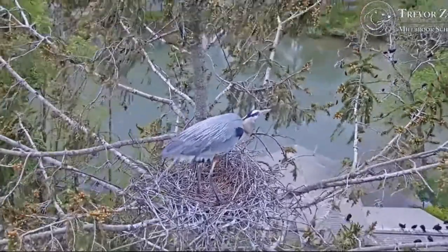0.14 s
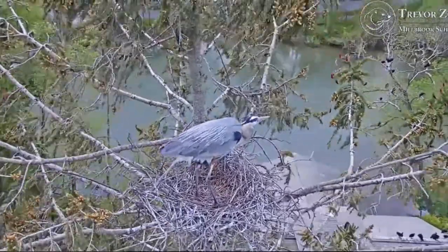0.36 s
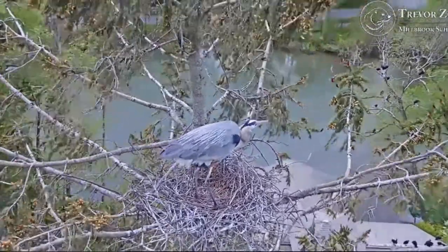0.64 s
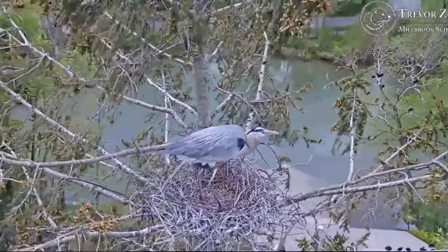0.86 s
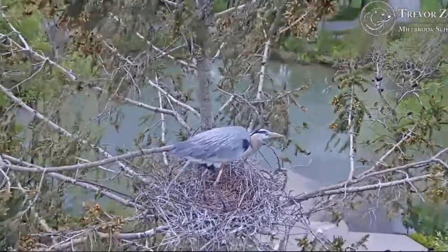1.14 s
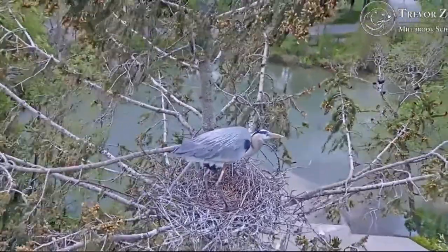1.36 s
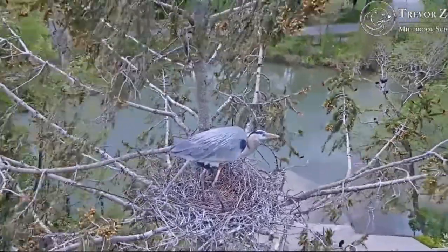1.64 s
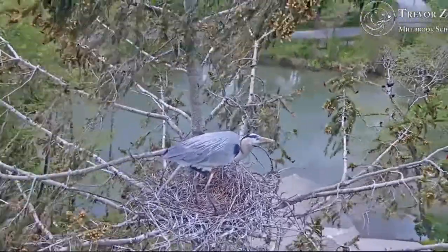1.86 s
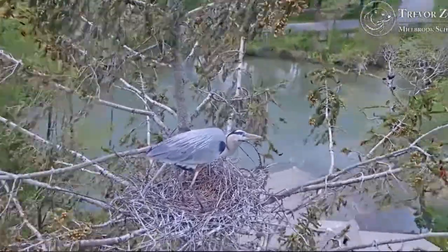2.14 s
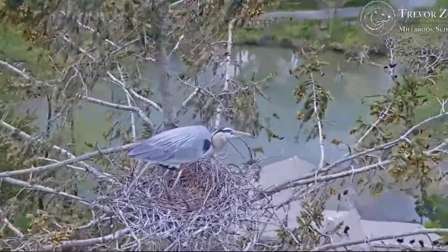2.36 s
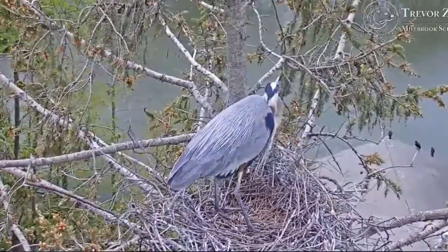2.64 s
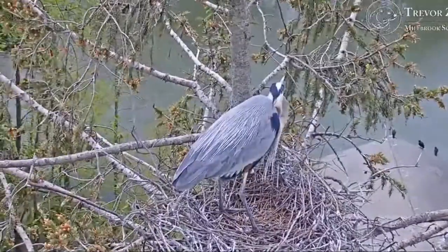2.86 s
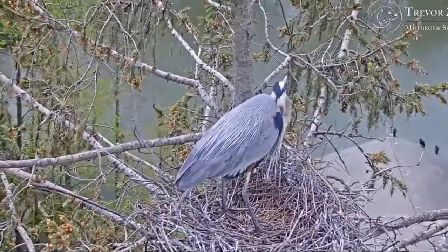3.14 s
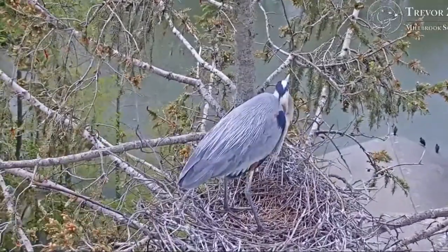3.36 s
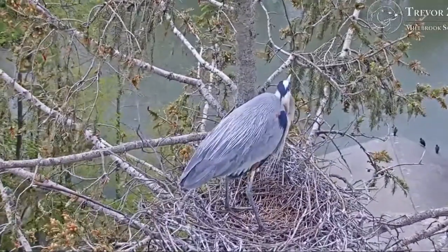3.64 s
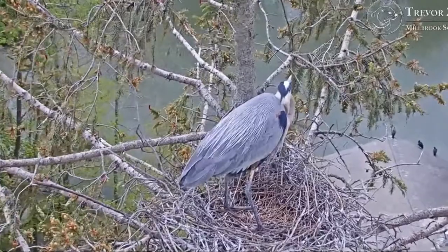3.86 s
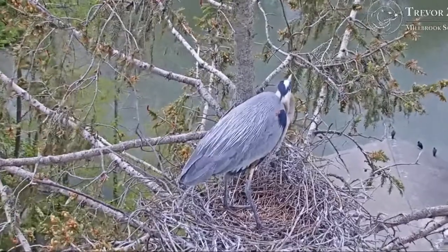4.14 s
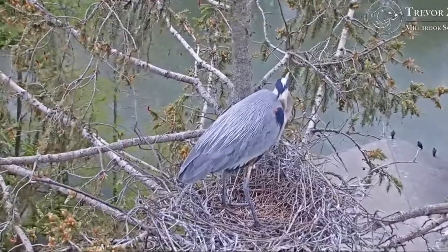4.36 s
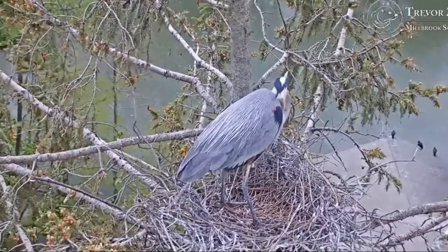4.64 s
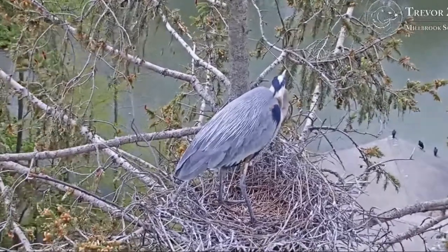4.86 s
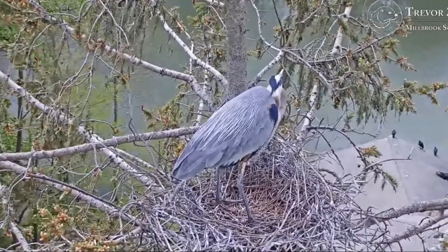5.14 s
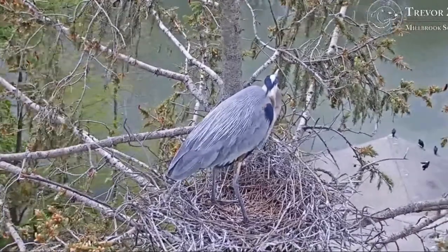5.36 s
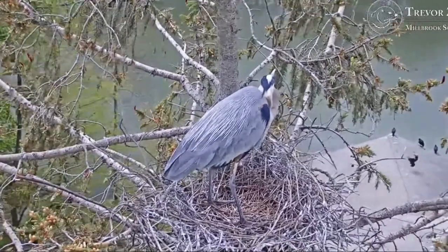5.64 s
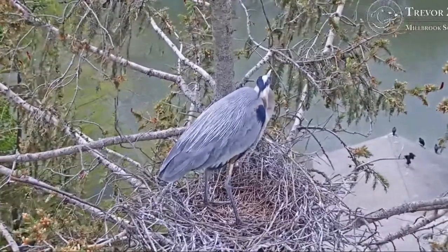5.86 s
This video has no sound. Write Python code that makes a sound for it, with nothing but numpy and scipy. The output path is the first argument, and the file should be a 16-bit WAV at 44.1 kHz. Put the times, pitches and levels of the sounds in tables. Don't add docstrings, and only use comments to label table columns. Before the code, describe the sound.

Gusty wind flutters low and blows hollowly on a small outdoor microphone, hissing through needles, with dry twig cracks and a brief final whistle.

```python
import sys
import numpy as np
from scipy import signal
from scipy.fft import rfft, irfft, next_fast_len
from scipy.io import wavfile
from scipy.ndimage import map_coordinates

SR = 44100
rng = np.random.default_rng(int(sys.argv[2]) if len(sys.argv) > 2 else 0)


def int16_out(signal):
    q = np.round(np.clip(np.atleast_2d(signal).T, -1, 1) * 32767)
    wavfile.write(sys.argv[1], SR, q.astype(np.int16))


def to_linear_factor(level_db):
    exponent = np.asarray(level_db, float) / 20
    return 10 ** exponent


N = 264908
TIME = np.arange(N) / SR

# time in seconds, push on the housing in dB, flow across the port in dB,
# port pitch in Hz, needle hiss in dB.
WIND = [(0.0, -55.5, -62, 2140, -69), (0.27, -50.5, -58.5, 2240, -63.5), (0.45, -57.5, -68, 2080, -71),
        (0.66, -52.5, -60, 2170, -65.5), (0.97, -51, -61.5, 2090, -66), (1.05, -60.5, -66.5, 2050, -69),
        (1.37, -56.5, -64, 2010, -67), (1.9, -49.5, -59, 2015, -66), (2.1, -54, -63, 2020, -66.5),
        (2.78, -54.5, -61.5, 1970, -69.5), (2.88, -62.5, -65.5, 2000, -68.5),
        (3.15, -66.5, -65.5, 2014, -68), (3.62, -61, -65, 2010, -64), (3.8, -47.5, -55.5, 2000, -62.5),
        (4.13, -56.5, -62, 1974, -66.5), (4.62, -47.5, -51.5, 2012, -60), (5.4, -50, -57.5, 1910, -70),
        (5.65, -54.5, -61.5, 1990, -67.5)]
# start in seconds, depth in dB, length in seconds.
LULLS = [
    (1.01, 1, 0.08),
    (4.367, 4.5, 0.1),
    (4.748, 6, 0.044),
    (4.893, 1, 0.022),
    (5.259, 12, 0.022),
    (5.474, 12, 0.012),
    (5.57, 4, 0.1),
]
# start in seconds, peak in dB, length in seconds.
PUSHES = [(0.086, -48, 0.03), (4.592, -40, 0.05), (0.345, -37, 0.021), (2.168, -37, 0.031),
          (1.001, -33, 0.015), (1.247, -45, 0.028), (1.299, -38, 0.038), (1.422, -43, 0.038),
          (1.496, -37.5, 0.054), (1.644, -35.5, 0.02), (1.774, -41, 0.047), (1.909, -29.5, 0.04),
          (2.021, -35, 0.026), (2.316, -39, 0.089), (2.482, -33, 0.022), (2.55, -33, 0.041),
          (2.774, -33.5, 0.092), (3.185, -46, 0.087), (3.293, -39.5, 0.04), (3.433, -44.5, 0.032),
          (3.994, -42, 0.14), (4.193, -37, 0.046), (4.257, -32, 0.079), (4.441, -32, 0.05),
          (4.846, -40, 0.02), (5.05, -45, 0.038), (5.183, -35.5, 0.03), (5.489, -37, 0.13),
          (5.871, -29, 0.032), (5.95, -32, 0.025)]
# start in seconds, peak in dB, hiss relative to it in dB,
# length in seconds.
PUFFS = [(0.3, -45, -15, 0.071), (0.413, -46.5, -19, 0.04), (0.724, -46, -19, 0.018),
         (0.9, -42, -13, 0.031), (0.992, -44.5, -10, 0.025), (1.732, -44, -16, 0.019),
         (1.795, -47.5, -13, 0.07), (1.913, -41, -11, 0.026), (1.968, -48, -14, 0.012),
         (2.544, -39, -11, 0.049), (2.772, -46, -13, 0.029), (2.803, -38.5, -12.5, 0.049),
         (3.72, -41.5, -11, 0.025), (3.795, -34.5, -11.5, 0.06), (3.857, -38.5, -13, 0.087),
         (4.044, -39, -14, 0.035), (4.269, -34.5, -12, 0.07), (4.442, -33, -8.5, 0.049),
         (4.5087, -32.5, -11, 0.053), (4.579, -35, -9.5, 0.054), (4.675, -39.5, -10.5, 0.12),
         (4.809, -34.5, -8, 0.051), (4.925, -39, -11, 0.087), (5.015, -37.5, -10.5, 0.023),
         (5.1, -47.5, -15, 0.11), (5.195, -37.5, -12, 0.073), (5.293, -37.5, -10.5, 0.21),
         (5.484, -41.5, -16, 0.12), (5.869, -35.5, -13, 0.033), (5.925, -42.5, -26, 0.08)]
# frequency in Hz, level in dB per Hz.
HOUSING_TONE = [(29, -81.5), (50, -44), (69, -40.5), (116, -18), (143, -4), (227, 3.5), (614, -7.5),
                (785, -17), (1060, -27), (1300, -21.5), (1690, -32), (2860, -120)]
PORT_HZ = [
    1770,
    2050,
    2350,
]
# frequency in Hz, gain in dB.
MIC_TONE = [(50, 4), (3500, 4.5), (5000, -4), (6500, -7.5), (7500, -29.5), (9000, -44), (11000, -63)]
# frequency in Hz, level in dB per Hz.
NEEDLE_TONE = [(1800, -23.5), (2700, -13), (3100, -1.5), (3800, 1.5), (4400, -8), (5000, -15), (6300, -19),
               (7000, -26), (8000, -45.5), (10000, -48.5), (12000, -80)]
# frequency in Hz, level in dB per Hz.
CANOPY_TONE = [(2500, -36.5), (4000, 2.5), (5000, -2), (6500, -5.5), (7300, -12), (9000, -18), (12000, -22),
               (12600, -73.5)]
# middle in seconds, extra level in dB, length in seconds.
LURCHES = [
    (0.62, 7, 0.077),
    (1.223, 14, 0.14),
    (2.2, 6.5, 0.17),
    (2.552, 7, 0.061),
    (3.3, 7, 0.057),
]
# time in seconds, peak in dB.
SNAPS = [(0.7231, -52), (0.991, -62), (1.639, -53), (1.7367, -52.5), (1.919, -38), (1.935, -45),
         (1.9607, -48.5), (2.044, -63), (2.052, -47), (1.598, -55), (2.5422, -58), (2.5664, -51),
         (2.7682, -55), (3.8159, -56), (3.8983, -47), (4.27, -60), (4.442, -55), (4.5227, -44),
         (4.558, -44), (4.6595, -44.5), (4.6765, -45), (4.7028, -46), (4.7434, -41), (4.8161, -40.5),
         (4.8327, -51), (5.2284, -49), (5.2862, -45), (5.4885, -51), (5.5736, -52), (5.873, -50)]
# time in seconds, peak in dB.
SNAP_EDGES = [
    (1.919, -77),
    (1.9599, -86),
    (2.5411, -67),
    (4.5226, -59),
    (5.2505, -62),
]
# start in seconds, level in dB, length in seconds.
PEEPS = [
    (5.005, -53, 0.03),
    (5.228, -49, 0.03),
    (5.3, -49.5, 0.035),
    (5.345, -51, 0.02),
    (5.385, -49, 0.028),
]
# time in seconds, pitch in Hz, level in dB.
WHISTLE = [
    (5.895, 1600, -58),
    (5.912, 1600, -51),
    (5.94, 1470, -52),
    (5.955, 1600, -50),
    (5.961, 1680, -45),
    (5.978, 1680, -46.5),
    (5.99, 1560, -58),
]


def unit(x):
    return x / np.sqrt(np.mean(x ** 2) + 1e-20)


def curves(rows):
    s, *columns = np.transpose(rows)
    return [np.interp(TIME, s, column) for column in columns]


def wobble(rate):
    knots = rng.standard_normal(int(N * rate / SR) + 4)
    return map_coordinates(knots, [TIME * rate])


def coloured(x, points):
    size = 2 * next_fast_len(N // 2 + 4096)
    hz, level = np.transpose(points)
    log_hz = np.log(np.fft.rfftfreq(size, 1 / SR) + 1)
    gain = to_linear_factor(np.interp(log_hz, np.log(hz + 1), level))
    cepstrum = irfft(np.log(gain / np.sqrt(np.mean(gain ** 2))), size)
    cepstrum[1:size // 2] *= 2
    cepstrum[size // 2 + 1:] = 0
    return irfft(rfft(x, size) * np.exp(rfft(cepstrum)), size)[:N]


def cavity(x, hz, width_hz):
    size = next_fast_len(N + 4096)
    f = np.fft.rfftfreq(size, 1 / SR)
    gain = (1j * f * width_hz / (hz * hz - f * f + 1j * f * width_hz)) ** 2
    gain_rms = np.sqrt(np.mean(np.abs(gain) ** 2))
    return irfft(rfft(x, size) * gain / gain_rms, size)[:N]


def bursts(times, levels_db, lengths, rise):
    power = np.zeros(N + SR)
    t = np.arange(SR // 4) / SR
    for s, db, length in zip(times, levels_db, np.clip(lengths, 0.001, 0.16)):
        shape = (1 - np.exp(-t / rise)) * np.exp(-(t / length) ** 6)
        start = max(round((s - rise) * SR), 0)
        power[start:][:len(t)] += (to_linear_factor(db) * shape) ** 2
    return np.sqrt(power[:N])


def grainy(rate, spread_db, share):
    sizes = to_linear_factor(spread_db * np.minimum(rng.exponential(size=N), 2))
    kicks = (rng.random(N) < rate / SR) * sizes * np.sign(rng.standard_normal(N))
    share = np.clip(share, 0, 1)
    return np.sqrt(1 - share) * rng.standard_normal(N) + np.sqrt(share) * unit(kicks)


def lulls():
    return sum(db * np.exp(-((TIME - s) / length * 2 - 1) ** 6) for s, db, length in LULLS)


def housing(buffet_db, eddies, grit):
    s, db, length = np.transpose(PUSHES)
    steady = to_linear_factor(buffet_db + 0.44 + 2.3 * eddies + 0.42 * wobble(12))
    push = np.hypot(steady, bursts(s, db - 14, length, rise=0.0045))
    rough_air = 0.35 * grit + 0.9 * grainy(250, spread_db=2, share=0.26)
    return coloured(push * rough_air, HOUSING_TONE)


def port(port_db, port_hz, eddies, grit, flutter):
    s, db, _, length = np.transpose(PUFFS)
    puffs = flutter * bursts(s, db - 12, length, rise=0.0016)
    blow = grit * np.hypot(to_linear_factor(port_db + 2 + 0.47 * eddies), puffs)
    shares = [np.interp(port_hz, PORT_HZ, row) for row in np.eye(len(PORT_HZ))]
    ring = sum(cavity(np.sqrt(share) * blow, hz, width_hz=596) for share, hz in zip(shares, PORT_HZ))
    unshaped = to_linear_factor(-10) * cavity(blow, 2180, width_hz=2860)
    near_whistle = to_linear_factor(-13.5) * cavity(shares[0] * blow, 1824, width_hz=190)
    lid = to_linear_factor(-7.5) * cavity(blow, 756, width_hz=546) + to_linear_factor(-17) * cavity(blow, 1499, width_hz=53)
    return to_linear_factor(-9) * coloured(ring + unshaped + near_whistle + lid, MIC_TONE)


def needles(needles_db, eddies, grit, flutter):
    s, db, hiss_db, length = np.transpose(PUFFS)
    steady = to_linear_factor(needles_db - 0.25 + 0.79 * eddies) * (0.38 * grit + 0.76 * rng.standard_normal(N))
    puffs = grit * flutter * bursts(s, db + hiss_db - 10.5, 0.9 * length, rise=0.00078)
    return coloured(steady + puffs, NEEDLE_TONE)


def wind():
    buffet_db, port_db, port_hz, needles_db = curves(WIND)
    lull_db = lulls()
    eddies = unit(wobble(14) + 0.44 * wobble(40) + 0.5 * wobble(110))
    flutter = to_linear_factor(1.5 * wobble(45))
    grit = grainy(300, spread_db=3.5, share=0.48)
    low = housing(buffet_db - 0.62 * lull_db, eddies, grit)
    middle = port(port_db - lull_db, port_hz, eddies, grit, flutter)
    high = needles(needles_db - 0.6 * lull_db, eddies, grit, flutter)
    return low + middle + high


def canopy():
    level = to_linear_factor(-83.5 + 1.3 * wobble(4.6))
    return level * coloured(rng.standard_normal(N), CANOPY_TONE)


def sway():
    buffet_db = curves(WIND)[0]
    db = -66 + 0.94 * (buffet_db + 55) + 2.5 * wobble(3.73)
    db = db - (TIME - 3)
    db = db + sum(extra * np.exp(-((TIME - s) / length) ** 2) for s, extra, length in LURCHES)
    rumble = to_linear_factor(db - 4.5 + 1.2 * wobble(5.7)) * cavity(rng.standard_normal(N), 144, width_hz=55)
    low_tone = [(40, -45), (110, -3.5), (400, -3), (900, -35.5)]  # Hz, dB
    return coloured(rumble, low_tone) / 8


def electronics():
    hz = 12960 - 48 * TIME + 55 * wobble(5)
    jitter_hz = 35 * wobble(30) + 70 * wobble(400)
    phase = 2 * np.pi * np.cumsum(hz + jitter_hz) / SR
    return to_linear_factor(-91.5 + 2.7 * wobble(300)) * np.sin(phase)


def twigs():
    jolt = np.sign(rng.standard_normal(N))

    def crack(s, db):
        return jolt * bursts(s, db, np.full(len(s), 0.002), rise=0.0003)

    s, db = np.transpose(SNAPS)
    knock_db = -52 + 0.15 * (db + 52)
    knock = coloured(cavity(crack(s, knock_db), 2000, width_hz=1100), MIC_TONE)
    s_edge, edge_db = np.transpose(SNAP_EDGES)
    bright_tone = [(5000, -64), (7500, -2), (12000, -15), (14500, -19), (16000, -54)]  # Hz, dB
    edges = coloured(crack(s_edge, edge_db - 6.5), bright_tone)
    return coloured(crack(s, db - 2), NEEDLE_TONE) + knock + edges


def peeps():
    s, db, length = np.transpose(PEEPS)
    hz = 1805 * (1 + 0.025 * wobble(90))
    phase = 2 * np.pi * np.cumsum(hz) / SR
    return bursts(s, db + 3, length, rise=0.005) * to_linear_factor(2 * wobble(150)) * np.sin(phase)


def whistle():
    hz, db = curves(WHISTLE)
    phase = 2 * np.pi * np.cumsum(hz * (1 + 0.025 * wobble(350))) / SR
    gate = np.interp(TIME, [5.895, 5.903, 5.98, 5.988], [0, 1, 1, 0])
    db = db + 2 * wobble(250)
    tone = to_linear_factor(db + 3.2) * np.sin(phase)
    octave = to_linear_factor(1.5 * db + 7) * np.sin(2 * phase)
    return gate * (tone + octave)


def scene():
    mix = wind() + canopy() + sway() + electronics() + twigs() + peeps() + whistle()
    return mix[None]


def low_pass(x):
    return signal.sosfilt(signal.butter(12, 15300, fs=SR, output="sos"), x)


def record(dry):
    return low_pass(dry)


dry = scene()
out = record(dry)
int16_out(out)
```